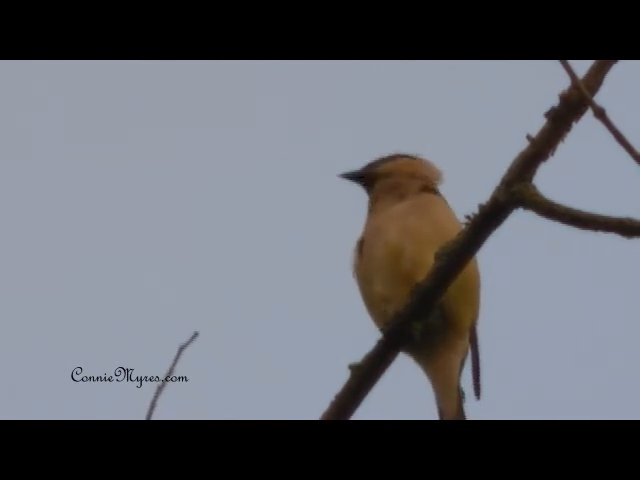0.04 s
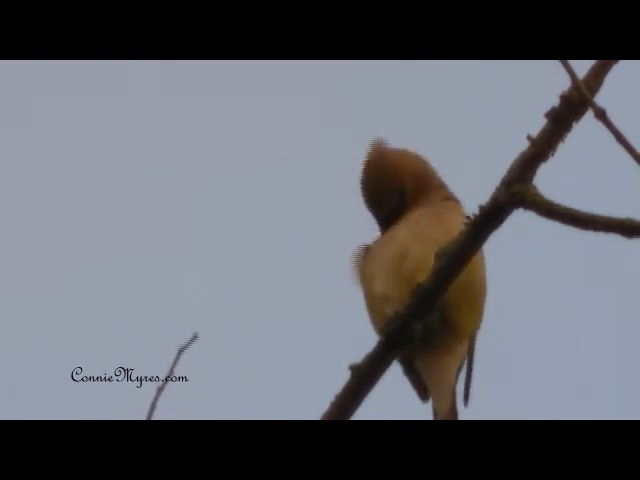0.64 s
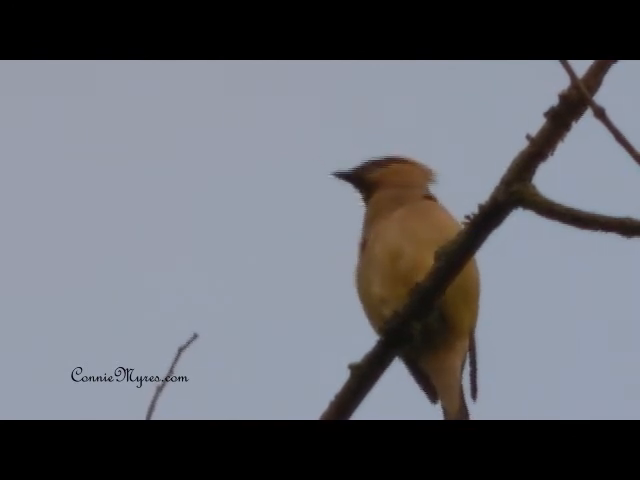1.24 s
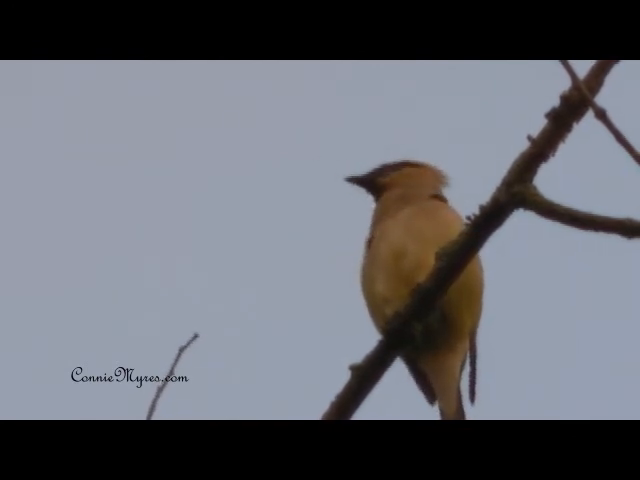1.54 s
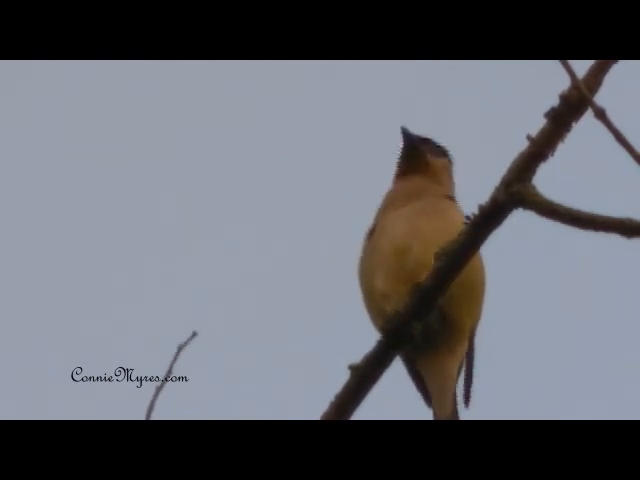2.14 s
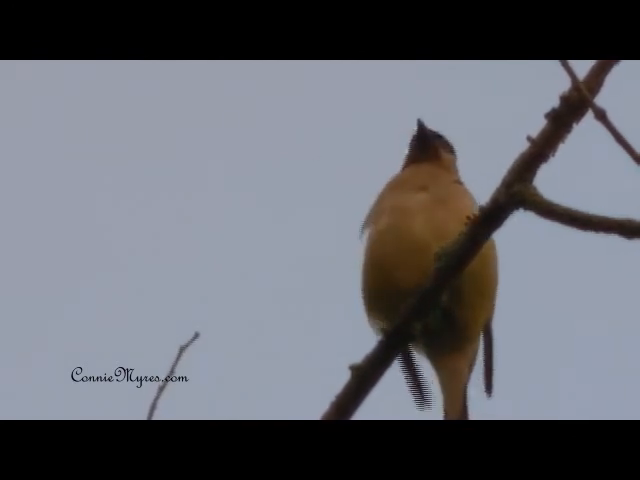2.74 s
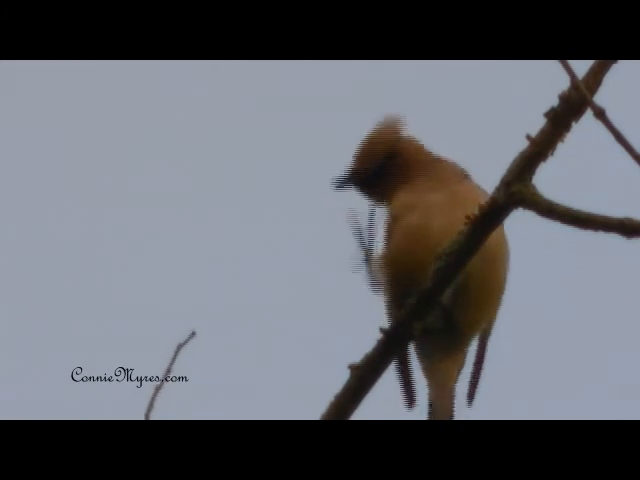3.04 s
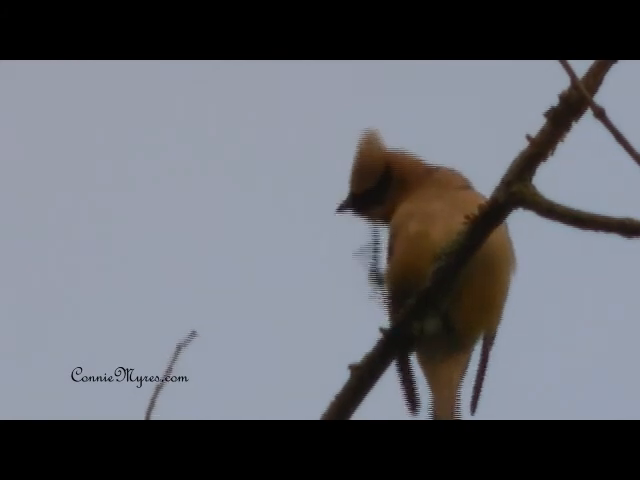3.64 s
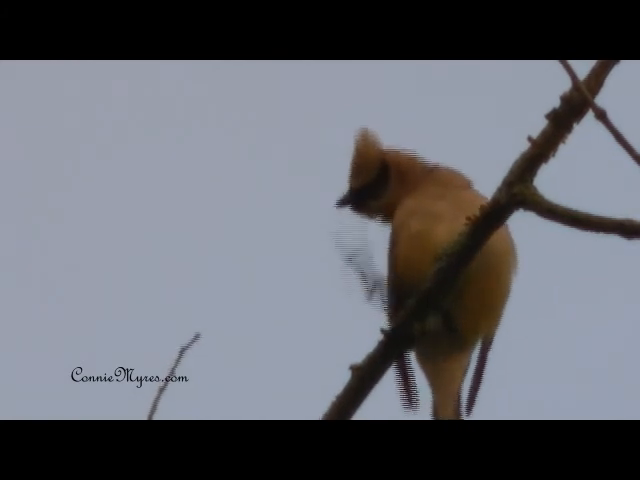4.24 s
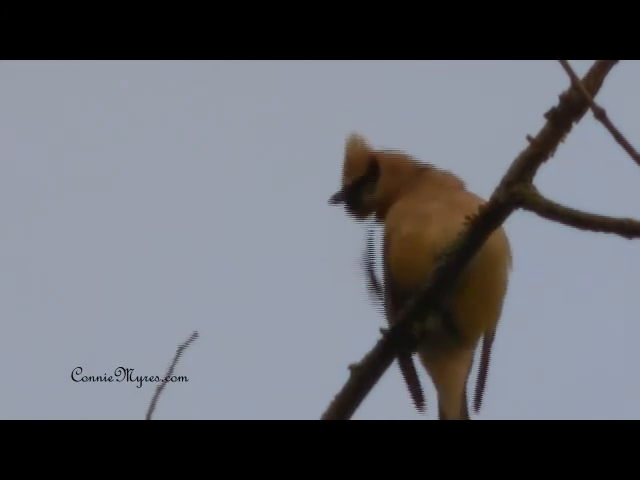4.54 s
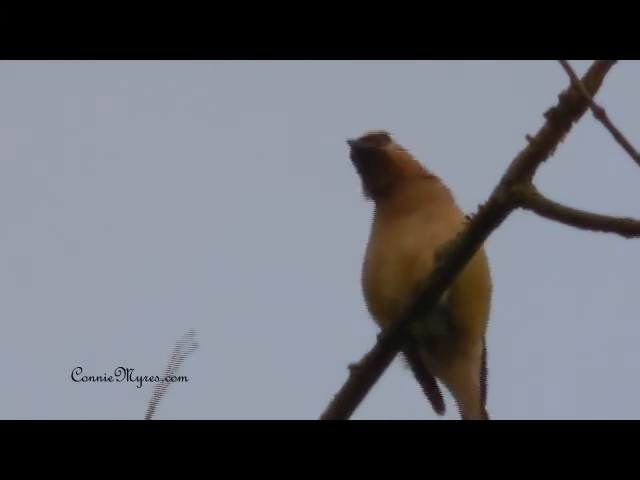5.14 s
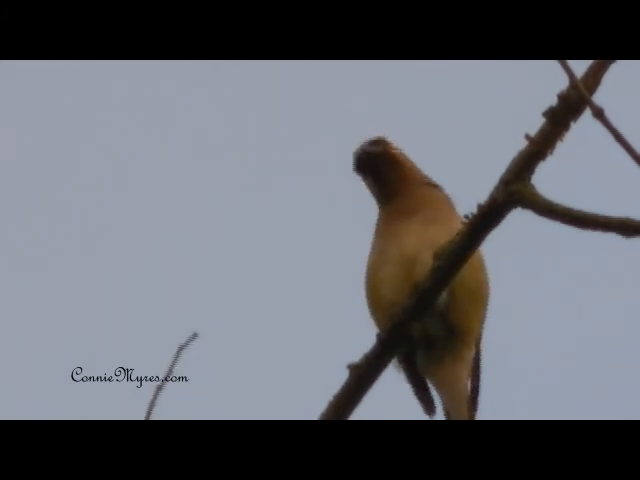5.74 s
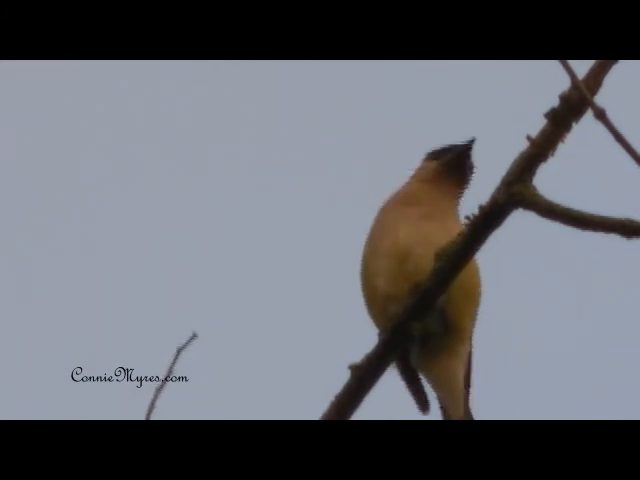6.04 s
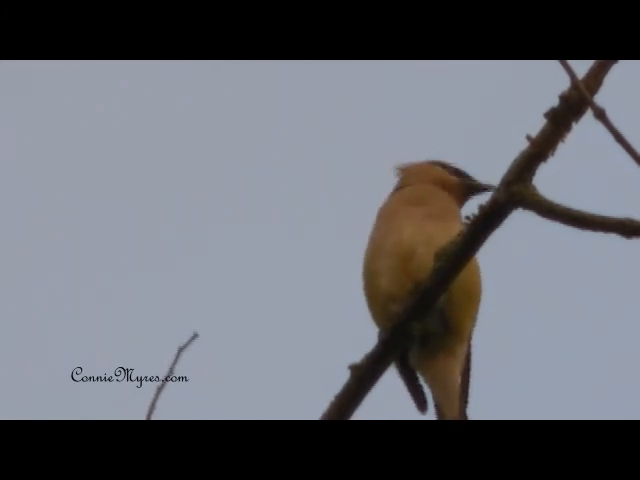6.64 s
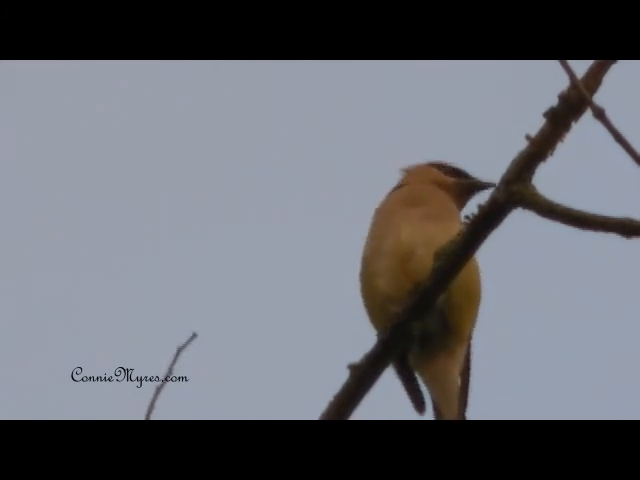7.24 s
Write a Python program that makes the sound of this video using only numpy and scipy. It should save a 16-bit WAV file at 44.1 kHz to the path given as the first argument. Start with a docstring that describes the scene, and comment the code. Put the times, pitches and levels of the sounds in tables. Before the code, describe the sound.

In a summer meadow by trees, many crickets sing without a break: high, fast pulsing and even trills, with field crickets chirping in quick threes. Faint bird whistles, short raspy notes and a few low yelps come from the trees. From about three seconds a bird gives six quick calls that sweep up and down, and a whistle slides down at the end. The microphone is near a few crickets, with soft distant air behind.

```python
"""A summer meadow at the edge of trees, where leaves scatter every call. From the start, distant air
rushes softly and many crickets sing, each wing stroke a short gliding tone; birds whistle far off.
Within the first second come a low yelp, two field crickets chirping in threes, a faint swell of noise,
a thin high call and short raspy notes. From about 3 s a bird throws in six arched sweeps,
and near the end a closer whistle slides down."""
import sys
import numpy as np
from scipy import signal
from scipy.fft import rfft, irfft
from scipy.io import wavfile
from scipy.ndimage import uniform_filter1d

SR = 44100
rng = np.random.default_rng(int(sys.argv[2]) if len(sys.argv) > 2 else 0)


def digitize_waveform(pressure):
    """Quantize a signal to 16-bit integers and store it at the path in sys.argv[1].

    Rows of a 2-D input are taken as channels; values are limited to [-1, 1].
    """
    field = np.atleast_2d(pressure).T
    bounded = np.clip(field, -1, 1)
    quanta = np.round(bounded * 32767).astype(np.int16)
    wavfile.write(sys.argv[1], SR, quanta)


N = 325899
TIME = np.arange(N) / SR

# tone colour of distant air, the hum of far insects and a faint hiss: f/Hz, relative level/dB
AIR_SPECTRUM = [(18, -60), (30, -30), (119, -27), (187, -22), (237, -13.5), (277, -11), (453, -1.5),
                (620, 1), (1100, 0.5), (1760, -2.5), (1980, -3), (2460, -2.5), (3300, -5.5), (4290, -8.5),
                (7260, -120)]
HUM_SPECTRUM = [(3000, -40.5), (3600, -21), (3850, -13.5), (4120, -25), (4400, -16.5), (4900, -11.5),
                (5250, -4), (5440, 2.5), (5600, 1.5), (5780, 0.5), (6000, -1.5), (6700, -1.5), (7100, -10),
                (7600, -39), (8500, -59)]
HISS_SPECTRUM = [(2500, -33), (3400, -4.5), (4600, -4.5), (6500, -1.5), (8000, -5.5), (9500, -10),
                 (13500, -13.5), (14300, -39), (15000, -30)]
# the beat of two trilling crickets: t/s, number of the wing stroke
LOW_TRILL_BEAT = [(.004, 0), (4.221, 125), (5.063, 150), (7.396, 219)]
HIGH_TRILL_BEAT = [(-.016, 0), (3.201, 100), (4.007, 125), (7.389, 230)]
# one wing stroke of each, held and then dropping: t/s from the beat, f/Hz, level/dB
LOW_TRILL_STROKE = [(-.014, 5480, -66), (-.009, 5460, -55), (-.003, 5420, -55.3), (0, 5230, -57.5),
                    (.003, 4900, -60.3), (.006, 4700, -69)]
HIGH_TRILL_STROKE = [(-.007, 5860, -61), (-.002, 5830, -54.8), (.002, 5770, -55.3), (.007, 5560, -62)]
# crickets further off:
# start t/s, end t/s, stroke rate/Hz, stroke length/s, start f/Hz, middle f/Hz, end f/Hz, level/dB
CHORUS = [ (0, 5.6, 14.6, .034, 6100, 6400, 5900, -58), (0, 5.5, 12.6, .034, 6300, 6540, 6050, -60),
          (2.72, 4.3, 13.5, .03, 6450, 6650, 6200, -55), (5.6, 7.4, 14.55, .032, 6250, 6500, 6050, -53.5),
          (5.5, 7.4, 12.4, .03, 6400, 6640, 6150, -55.5), (6.97, 7.4, 14.3, .032, 6500, 6520, 5950, -52),
          (3.18, 4.2, 12.4, .026, 7100, 7450, 7050, -68)]
# distant bird whistles: t/s, length/s, start f/Hz, middle f/Hz, end f/Hz, level/dB
WHISTLES = [ (.02, 0.075, 3850, 3830, 3860, -68.5), (0.596, .125, 4210, 4360, 4170, -63.5),
            (0.698, 0.095, 3810, 3860, 3930, -65), (0.781, 0.16, 4190, 4030, 3900, -70.5),
            (0.846, .12, 5000, 4900, 4880, -66), (2.304, .08, 3700, 3740, 3780, -72),
            (2.854, 0.17, 3850, 3780, 3700, -67), (2.871, .045, 2684, 2700, 2660, -67),
            (2.908, 0.061, 4230, 4530, 4300, -65), (3.09, 0.25, 3470, 3310, 3490, -66),
            (3.33, 0.18, 3490, 3730, 3900, -67), (3.881, 0.57, 4100, 4060, 4100, -70.5),
            (4.07, 0.26, 3700, 3766, 3734, -67), (4.678, 0.26, 4200, 4300, 4150, -72),
            (4.72, 0.14, 3880, 3910, 3900, -75), (4.9, 0.043, 3850, 3800, 3930, -63),
            (5.68, 0.16, 3830, 3790, 3890, -71), (6.41, 0.16, 3880, 3830, 3900, -69),
            (6.9, .22, 3580, 3500, 3440, -71), (7.11, 0.11, 3820, 3810, 3800, -67),
            (7.28, 0.095, 4370, 4360, 4310, -64.5)]
# one closer whistle, held and then sliding down: t/s, f/Hz, level/dB
FALLING_WHISTLE = [(7.175, 4430, -68), (7.2, 4410, -62), (7.25, 4360, -62), (7.275, 4250, -63),
                   (7.297, 3780, -58.5), (7.32, 3600, -60), (7.36, 3470, -58), (7.39, 3400, -63)]
# the almost even beat of the two nearest crickets: t/s, number of the wing stroke
FAST_BEAT = [(.043, 0), (1.474, 20), (2.893, 40), (3.533, 49), (4.043, 56)]
SLOW_BEAT = [(.04, 0), (1.04, 6), (2.534, 15), (4.502, 27), (5.666, 34), (7.308, 44)]
# one wing stroke of each, rising and falling: t/s from the beat, f/Hz, level/dB
FAST_STROKE = [(-.018, 6520, -58), (-.012, 6730, -50), (-.006, 6880, -47.3), (0, 6915, -46.8),
               (.005, 6800, -48.3), (.01, 6520, -52.5), (.016, 5980, -61)]
SLOW_STROKE = [(-.015, 6450, -60), (-.009, 6660, -54.5), (-.004, 6800, -52.5), (-.001, 7030, -53),
               (.002, 6850, -50), (.006, 6740, -51.5), (.01, 6500, -55.5), (.014, 6150, -63)]
# low two-voiced bird yelps: t/s, length/s, middle f/Hz, lower voice level/dB, upper voice level/dB
YELPS = [(.104, .038, 1800, -54.5, -65), (1.622, .038, 1750, -65, -66), (1.751, .036, 1660, -56.5, -58.5),
         (6.314, .04, 1780, -54, -60)]
# near field cricket's chirps: last stroke t/s, last stroke level/dB, growth per stroke/dB
NEAR_CHIRPS = [(.522, -47, 3), (1.268, -47.5, 2.5), (1.918, -47, 4), (2.614, -47.5, 3), (3.235, -47.5, 2.8),
               (3.784, -47, 1.5), (4.573, -48, 3), (5.349, -48.5, 2), (6.149, -48, 2), (7.009, -49, 1.5)]
# far field cricket's chirps: last stroke t/s, last stroke level/dB
FAR_CHIRPS = [(.49, -61), (1.2, -61), (1.99, -60), (2.6, -59), (3.24, -60), (3.8, -57), (4.48, -59),
              (4.985, -59), (5.53, -58.5), (6.04, -57), (6.69, -58.5)]
# faint, far-off swells of noise: peak t/s, length/s, centre f/Hz, width/Hz, level/dB
SWELLS = [(.6, .15, 743, 500, -66), (4.6, .65, 1190, 130, -70), (4.6, 3.4, 580, 380, -71.5),
          (4.4, 2.4, 3500, 1100, -72), (6.46, .15, 237, 30, -80), (6.618, .09, 250, 40, -78),
          (6.613, .06, 530, 170, -66)]
# thin, high bird calls: t/s, length/s, level/dB
THIN_CALLS = [(.625, .26, -68), (4.71, .27, -73.5)]
# short raspy notes deep in the trees: t/s, length/s, start f/Hz, middle f/Hz, end f/Hz, level/dB
RASPY_NOTES = [ (0.696, 0.025, 1450, 2745, 3150, -59), (0.74, 0.041, 3880, 2940, 2400, -60.5),
               (1.432, 0.11, 2950, 2480, 2390, -68), (1.573, 0.069, 3260, 2920, 2630, -63.5),
               (1.626, 0.1, 2690, 3180, 2330, -63), (2.268, 0.051, 3210, 2960, 3210, -64),
               (3.838, 0.032, 3010, 3420, 3450, -61.5), (4.132, 0.0136, 3300, 2620, 2300, -61),
               (5.279, 0.158, 2860, 2740, 2810, -68), (6.561, 0.086, 3700, 3350, 3040, -65),
               (6.645, 0.04, 3110, 3520, 2940, -61), (6.677, 0.05, 3060, 2540, 2370, -59)]
# a bird's arched calls: t/s, length/s, top f/Hz, sag/Hz, climb level/dB, top level/dB, plunge level/dB
SWEEPS = [ (2.989, .116, 4040, 240, -59, -54.5, -52.3), (3.505, .083, 4110, 260, -56.7, -52.3, -68),
          (4.432, .118, 4130, 200, -58.5, -56, -52), (4.96, .089, 4200, 300, -56, -51.8, -64),
          (5.831, .122, 4040, 200, -55.5, -51.5, -50.3), (6.735, .122, 4190, 200, -54, -51, -56.5)]


def undb(db):
    """Turn decibels into a number to multiply the sound by."""
    return 10 ** (np.asarray(db) / 20)


def noise(spectrum):
    """Noise with a spread of 1, coloured by rows of (f/Hz, level/dB)."""
    hz, db = np.transpose(spectrum)
    f = np.maximum(np.arange(N // 2 + 1) * SR / N, 1)
    gain = undb(np.interp(np.log(f), np.log(hz), db))
    x = irfft(rfft(rng.standard_normal(N)) * gain, N)
    return x / x.std()


def wander(rate):
    """A random curve with a spread near 1 that turns about `rate` times a second."""
    size = int(SR / rate)
    held = np.repeat(rng.standard_normal(N // size + 1), size)
    return uniform_filter1d(held, size)[:N] * np.sqrt(3 / 2)


def add(out, s, x):
    """Mix x into out, starting at s seconds."""
    i = int(s * SR)
    a, b = max(i, 0), min(i + len(x), N)
    if b > a:
        out[a:b] += x[a - i:b - i]


def background():
    """Wide, gently shifting air noise, the hum of countless far insects and a faint hiss."""
    mid = noise(AIR_SPECTRUM + [(4500, -25), (7000, -42)])
    side = undb(-5) * noise(AIR_SPECTRUM + [(4500, -25), (7000, -66)])
    air = (mid + np.array([side, -side])) * undb(-62 + .42 * wander(9.4))
    hum = noise(HUM_SPECTRUM) + undb(-11) * np.array([noise(HUM_SPECTRUM), noise(HUM_SPECTRUM)])
    hum *= undb(-55 + 1.2 * wander(25))
    return air + hum + undb(-70) * noise(HISS_SPECTRUM)


def glide(path, ratio=1):
    """A tone with soft ends that follows rows of (t/s, f/Hz, level/dB), its pitch times `ratio`."""
    s, hz, db = np.transpose(path)
    s = np.maximum.accumulate(s)
    t = s[0] + np.arange(max(int((s[-1] - s[0]) * SR), 2)) / SR
    pitch = uniform_filter1d(np.interp(t, s, hz), size=160, mode="nearest") * ratio
    ends = np.clip(np.minimum(t - t[0], t[-1] - t) / .003, 0, 1)
    phase = 2 * np.pi * (np.cumsum(pitch) / SR + rng.random())
    return np.sqrt(2) * np.sin(phase) * undb(np.interp(t, s, db)) * ends


def beat(counted):
    """The time of every wing stroke, spaced evenly between the counted ones."""
    s, number = np.transpose(counted)
    return np.interp(np.arange(number[-1] + 1), number, s)


def wing_strokes(times, stroke, vary_db, detune, warm_up_db=0):
    """One wing scrapes the other's row of teeth; a cricket still warming up is softer and lower."""
    out = np.zeros(N)
    for s, (loud, sharp) in zip(times, rng.standard_normal((len(times), 2))):
        effort_db = -warm_up_db * np.exp(-s / .8)
        ratio = 1 + .008 * effort_db + detune * sharp
        add(out, s + stroke[0][0], undb(effort_db + vary_db * loud) * glide(stroke, ratio))
    return out


def quaver(x, depth, rate):
    """Shake the pitch a little: a held note is never quite steady."""
    return np.real(signal.hilbert(x) * np.exp(1j * depth * wander(rate)))


def foliage(x, echo_db, ring_s, above_hz=1000, stir=0):
    """Leaves throw back the treble, a little differently on each side, and blur its pitch if they stir."""
    t = np.arange(SR * 3 // 4) / SR
    tails = rng.standard_normal((2, len(t))) * undb(-60 * t / ring_s) * (1 - np.exp(-t / .0061))
    tails /= np.sqrt(np.sum(tails ** 2, axis=1, keepdims=True))
    treble = signal.sosfilt(signal.butter(3, above_hz, "high", fs=SR, output="sos"), x)
    if stir:
        treble = quaver(treble, depth=stir, rate=300)
    mid, side = (undb(echo_db) * signal.fftconvolve(treble, tail)[:N] for tail in tails)
    return x + mid + undb(-16.5) * np.array([side, -side])


def trilling_crickets():
    """Two crickets trill fast and evenly; the leaves draw their strokes out into steady tones."""
    low = wing_strokes(beat(LOW_TRILL_BEAT), LOW_TRILL_STROKE, vary_db=.6, detune=.003)
    high = wing_strokes(beat(HIGH_TRILL_BEAT), HIGH_TRILL_STROKE, vary_db=.5, detune=.002)
    return foliage(low + high, echo_db=-3.5, ring_s=.4)


def arc(s, length, first_hz, mid_hz, last_hz, db, fade_db=6):
    """The path of one note: it bends through three pitches and is fade_db softer at its ends."""
    u = np.linspace(0, 1, num=17)
    pitch = np.polyval(np.polyfit([0, .5, 1], [first_hz, mid_hz, last_hz], 2), u)
    return np.transpose([s + length * u, pitch, db - fade_db * (2 * u - 1) ** 2])


def cricket_chorus():
    """Crickets further off each keep their own wandering beat; together they shimmer."""
    out = np.zeros(N)
    for start, end, rate, length, first_hz, mid_hz, last_hz, db in CHORUS:
        stroke = arc(-length / 2, length, first_hz, mid_hz, last_hz, db, fade_db=7)
        gaps = 1 + .008 * rng.standard_normal(300)  # in beats
        times = start + (np.cumsum(gaps) - 1) / rate
        out += wing_strokes(times[times < end], stroke, vary_db=1.2, detune=.004)
    return foliage(out * undb(1.5 * wander(500)), echo_db=-8, ring_s=.25)


def bird_voice(paths, waver_db, upper_ratio=2, upper_db=-35):
    """A bird's voice box makes a nearly pure tone, with one weaker tone above it."""
    out = np.zeros(N)
    for path in paths:
        add(out, path[0][0], glide(path) + undb(upper_db) * glide(path, upper_ratio))
    return out * undb(waver_db * wander(150))


def whistles():
    """Birds whistle; under each arched sweep, the other side of the voice box holds a faint note."""
    notes = [arc(*row) for row in WHISTLES] + [FALLING_WHISTLE]
    held_hz = 2520
    held = [arc(s + .048, .048, held_hz, held_hz, held_hz, db=-67.5) for s, *_ in SWEEPS]
    voice = quaver(bird_voice(notes + held, waver_db=2.5), depth=.7, rate=150)
    return foliage(voice, echo_db=-6, ring_s=.6, stir=.9)


def near_crickets():
    """Two close crickets; uneven wing teeth roughen the tone, and the faster has a faint octave."""
    fast = wing_strokes(beat(FAST_BEAT), FAST_STROKE, vary_db=.4, detune=.003, warm_up_db=3)
    fast *= undb(1.1 * wander(600))
    slow = wing_strokes(beat(SLOW_BEAT), SLOW_STROKE, vary_db=.5, detune=.003)
    slow *= undb(1.8 * wander(600))
    octave = np.real(signal.hilbert(fast) ** 2) / np.abs(fast).max()  # squaring doubles the pitch
    return foliage(fast + slow + undb(-33) * octave, echo_db=-17, ring_s=.2)


def rasp(x, depth, rate):
    """The voice box's thin skin flutters in pitch, most on slack low notes; a small bird has no bass."""
    whole = signal.hilbert(x)
    slack = signal.sosfiltfilt(signal.butter(4, 3300, fs=SR, output="sos"), whole)
    fluttered = np.real(whole - slack + slack * np.exp(1j * depth * wander(rate)))
    return signal.sosfilt(signal.butter(2, 700, "high", fs=SR, output="sos"), fluttered)


def twigs(x, spread_s, db):
    """Twigs round the bird add close echoes that blur a fast glide."""
    t = np.arange(SR // 20) / SR
    echoes = rng.standard_normal(len(t)) * np.exp(-t / spread_s)
    return x + undb(db) * signal.fftconvolve(x, echoes / np.linalg.norm(echoes))[:N]


def yelps():
    """The two sides of a bird's voice box rise and fall together, one above the other."""
    paths = []
    for s, length, mid_hz, lower_db, upper_db in YELPS:
        for hz, db in (mid_hz, lower_db), (1.72 * mid_hz, upper_db):
            paths.append(arc(s, length, .75 * hz, hz, .575 * hz, db, fade_db=5))
    voice = rasp(bird_voice(paths, waver_db=1.2), depth=.5, rate=700)
    return foliage(twigs(voice, spread_s=.015, db=-11), echo_db=-11, ring_s=.4, stir=.8)


def chirps(rows, hz, fall, length):
    """Three falling wing strokes to a chirp, each louder, higher and less steep than the one before."""
    out = np.zeros(N)
    u = np.linspace(-1, 1, num=7)  # from the start of a stroke to its end
    for s, db, growth_db in rows:
        for to_come, early_s in (2, .092), (1, .048), (0, 0):
            drop = fall * (1 + .25 * to_come) * (u + .55 * u ** 2)
            pitch = hz * (1 - .009 * to_come - drop)
            level = db - growth_db * to_come - 11 * u ** 2
            add(out, s - early_s - length / 2, glide(np.transpose([u * length / 2, pitch, level])))
    return out


def field_crickets():
    """One field cricket chirps close by; another is higher, more even and further off."""
    near = quaver(chirps(NEAR_CHIRPS, hz=4180, fall=.029, length=.021), depth=.2, rate=400)
    far = chirps([(s, db, .6) for s, db in FAR_CHIRPS], hz=4830, fall=.036, length=.022)
    return foliage(near, echo_db=-7.2, ring_s=.6) + foliage(far, echo_db=-2.5, ring_s=.4)


def swells():
    """Narrow bands of noise that each rise and sink once."""
    out = np.zeros(N)
    for s, length, hz, width, db in SWELLS:
        low_hz, high_hz = hz * np.exp(-1.5 * width / hz), hz + 2 * width
        band = noise([(low_hz, -45), (hz - width / 2, -3), (hz + width / 2, -3), (high_hz, -45)])
        out += band * undb(db) * np.exp(-(2 * (TIME - s) / length) ** 2)
    return out


def thin_calls():
    """A bird's high, two-voiced call swells quickly, then sinks a little in level and pitch."""
    rise_s, settle_s, fade_db_per_s = .05, .12, 8
    paths = []
    for s, length, db in THIN_CALLS:
        t = np.linspace(0, length, num=30)
        swell_db = 20 * np.log10(np.minimum(t / rise_s, 1) + 1e-3)
        pitch = 8000 - 500 * (1 - np.exp(-t / settle_s))
        paths.append(np.transpose([s + t, pitch, db + swell_db - fade_db_per_s * t]))
    voice = bird_voice(paths, waver_db=3.5, upper_ratio=1.09, upper_db=-8.5)
    return foliage(quaver(voice, depth=1, rate=140), echo_db=-4, ring_s=.6, stir=1.5)


def raspy_birds():
    """Short notes and arched sweeps, roughened by flutter and blurred by twigs and leaves."""
    notes = bird_voice([arc(*row) for row in RASPY_NOTES], waver_db=2)
    notes = quaver(rasp(notes, depth=.8, rate=1000), depth=.9, rate=600)
    sweeps = bird_voice([sweep(*row) for row in SWEEPS], waver_db=2)
    sweeps = quaver(rasp(sweeps, depth=.85, rate=1000), depth=.55, rate=300)
    blurred = twigs(notes + sweeps, spread_s=.014, db=-5)
    return foliage(blurred, echo_db=1, ring_s=.75, above_hz=3700, stir=.85)


def sweep(s, length, top_hz, sag_hz, climb_db, top_db, plunge_db):
    """The path of an arched call: a climb, a sagging hold and a plunge, each with its own push."""
    start_hz, end_hz = 1200, 1800
    climb_s, sag_s, plunge_s = .044, .024, .026
    t = np.linspace(0, length, num=60)
    climb = np.sin(np.pi / 2 * np.minimum(t / climb_s, 1) ** 1.45)
    sag = np.clip((t - climb_s) / sag_s, 0, 1)
    plunge = np.clip(1 - (length - t) / plunge_s, 0, 1) ** 1.2
    held = start_hz + (top_hz - start_hz) * climb - sag_hz * sag
    pitch = held + (end_hz - held) * plunge
    pushes = [(climb_db, .017, .022), (top_db, .055, .017), (plunge_db, length - .009, .009)]
    effort = sum(undb(db) * np.exp(-((t - peak_s) / width_s) ** 2) for db, peak_s, width_s in pushes)
    return np.transpose([s + t, pitch, 20 * np.log10(effort + 1e-9)])


def scene():
    """Air, insects and birds together."""
    return (background() + trilling_crickets() + cricket_chorus() + whistles() + near_crickets()
            + yelps() + field_crickets() + swells() + thin_calls() + raspy_birds())


def record(dry):
    """Cut away the treble above 15000 Hz."""
    return signal.sosfilt(signal.ellip(8, .2, 70, 15000, fs=SR, output="sos"), dry)


dry = scene()
out = record(dry)
digitize_waveform(out)
```